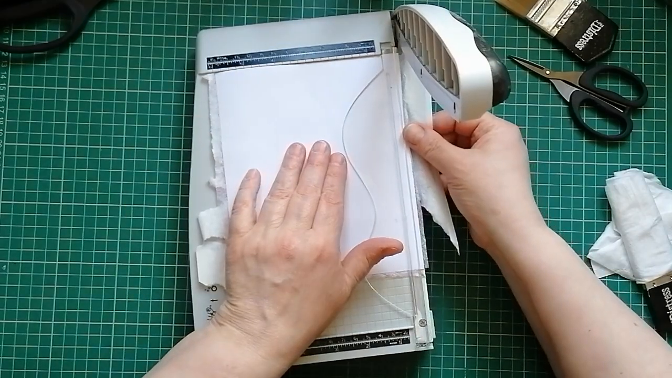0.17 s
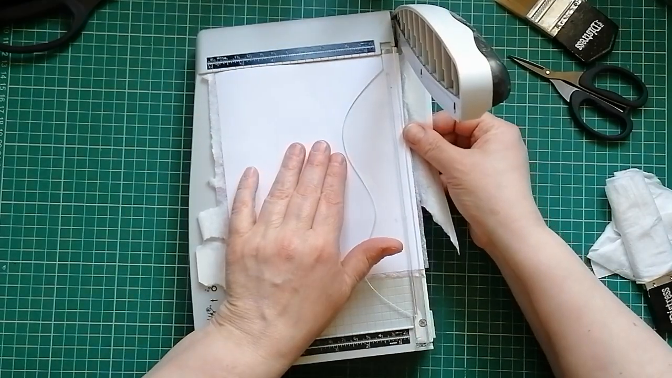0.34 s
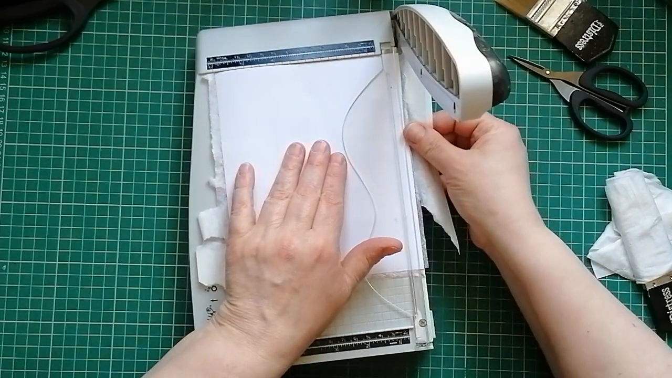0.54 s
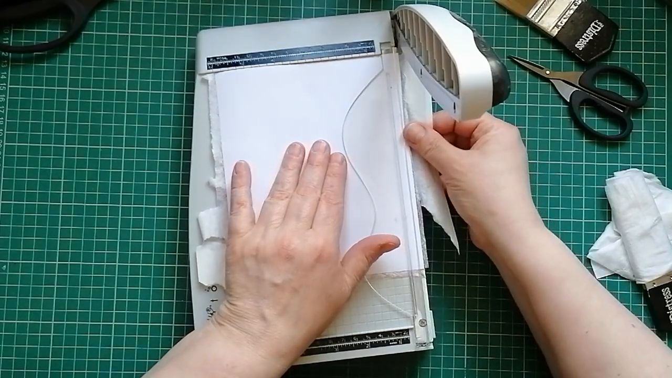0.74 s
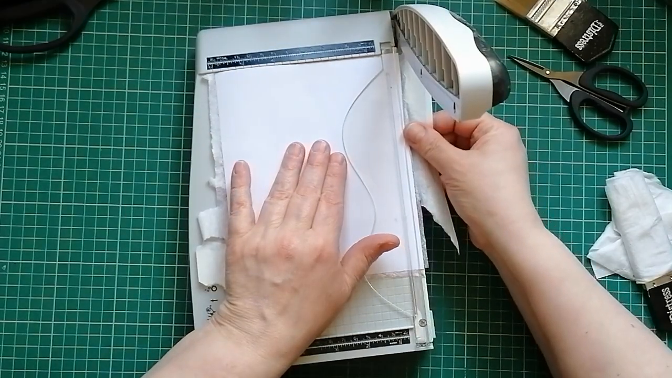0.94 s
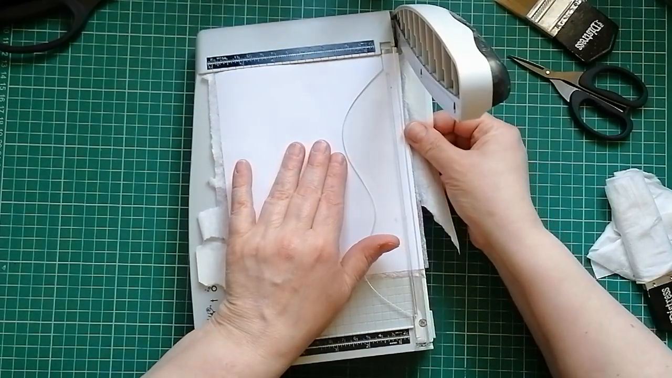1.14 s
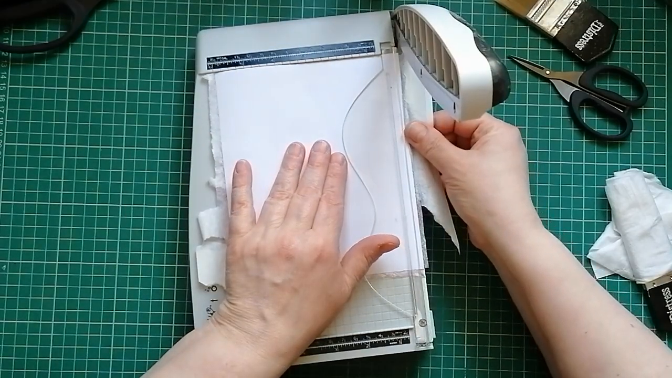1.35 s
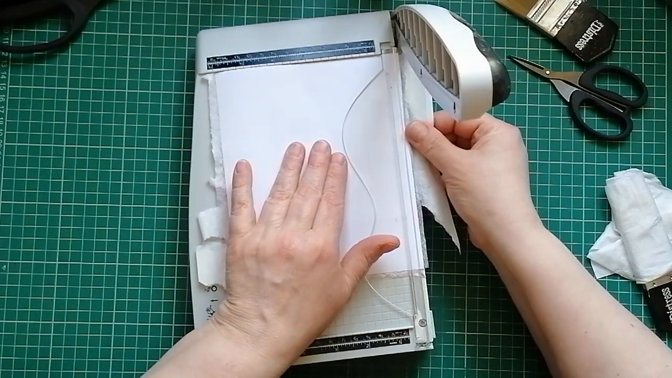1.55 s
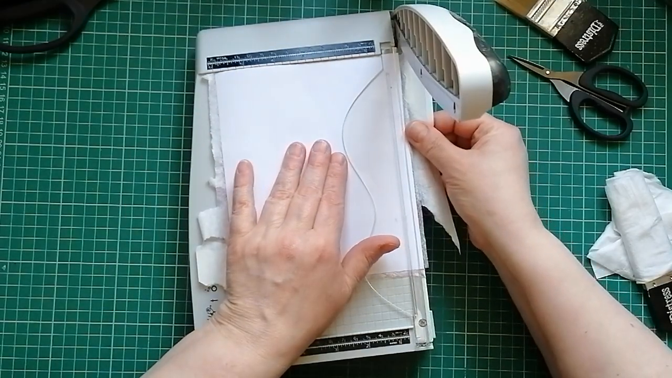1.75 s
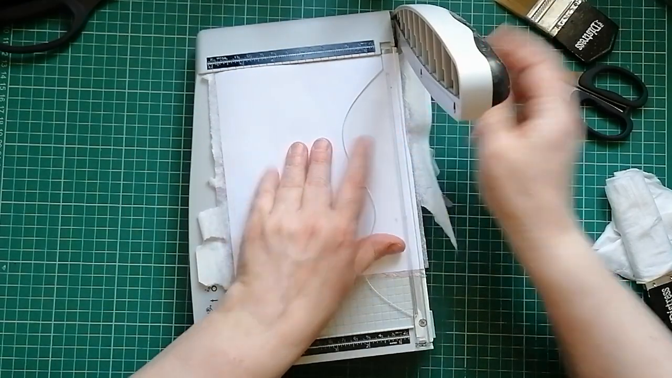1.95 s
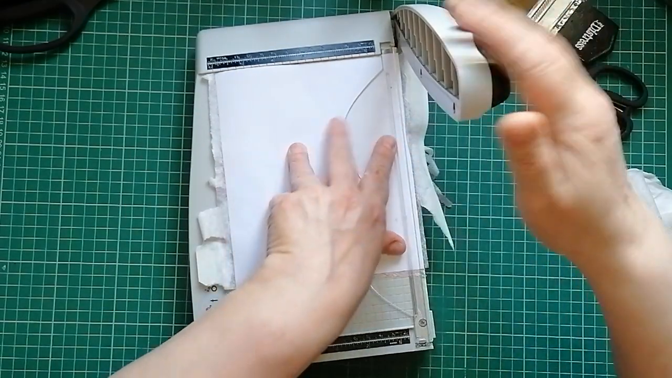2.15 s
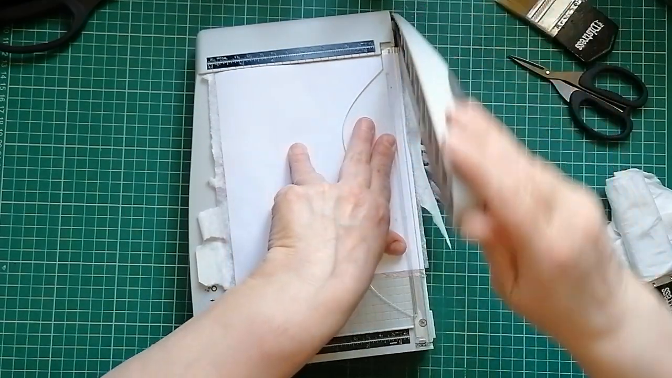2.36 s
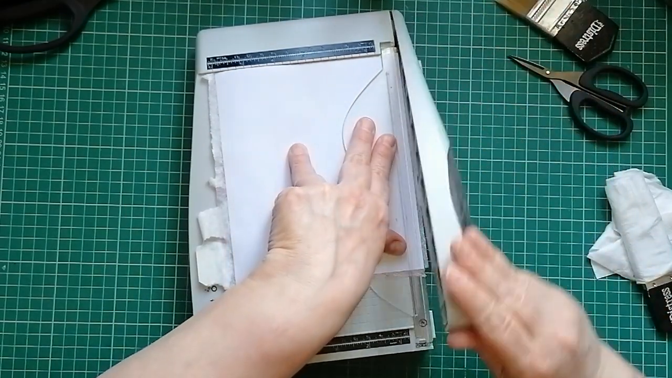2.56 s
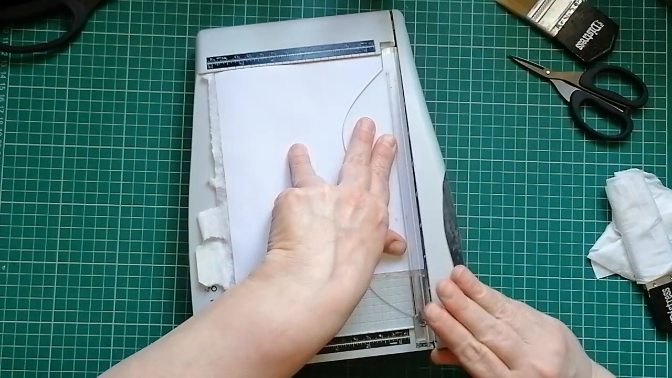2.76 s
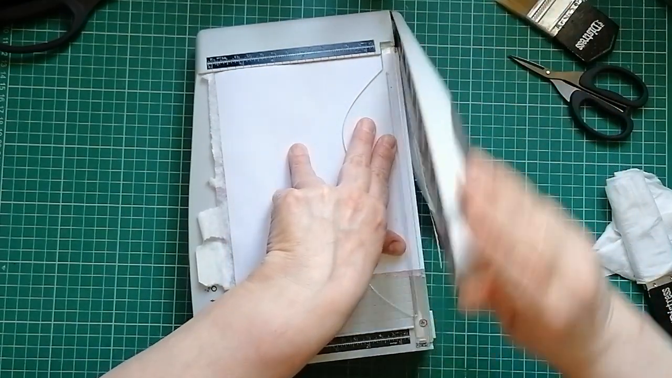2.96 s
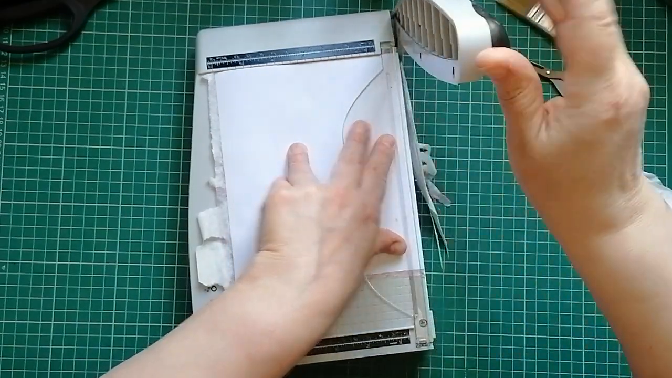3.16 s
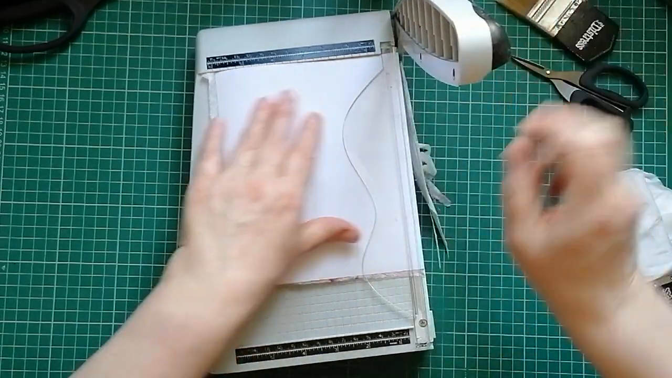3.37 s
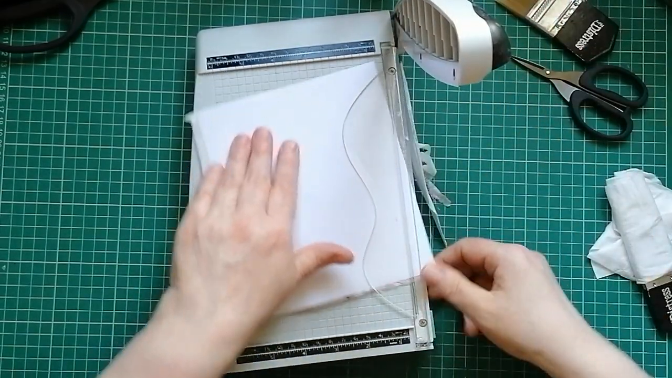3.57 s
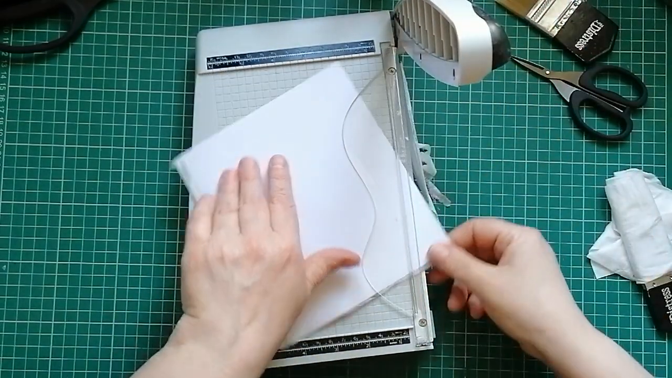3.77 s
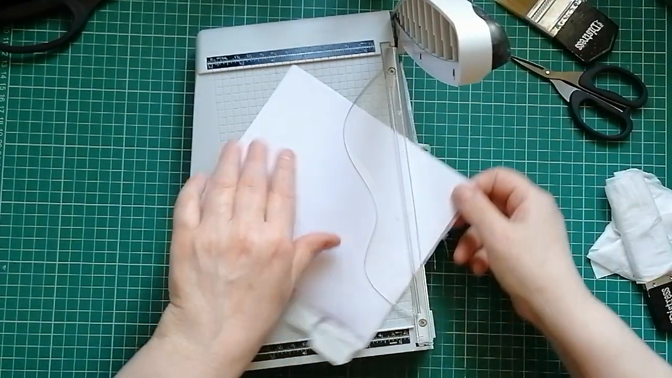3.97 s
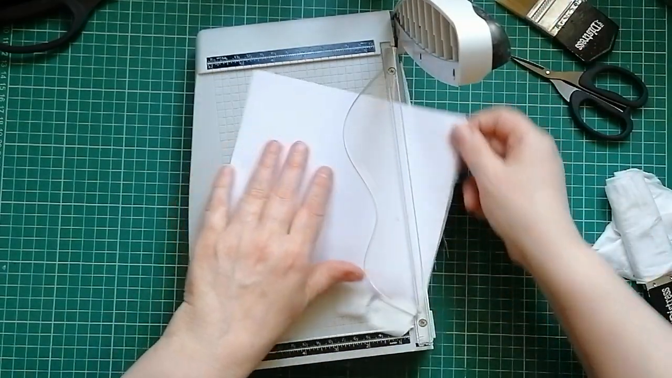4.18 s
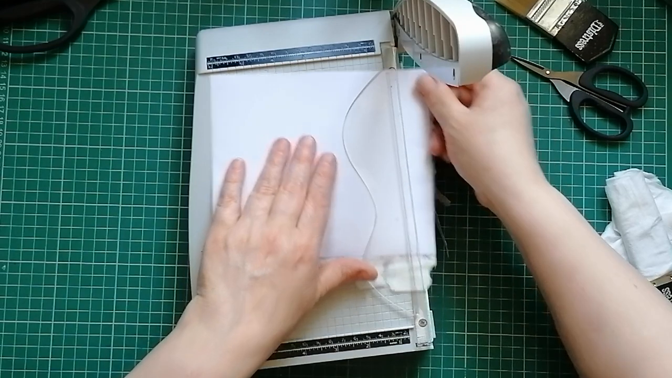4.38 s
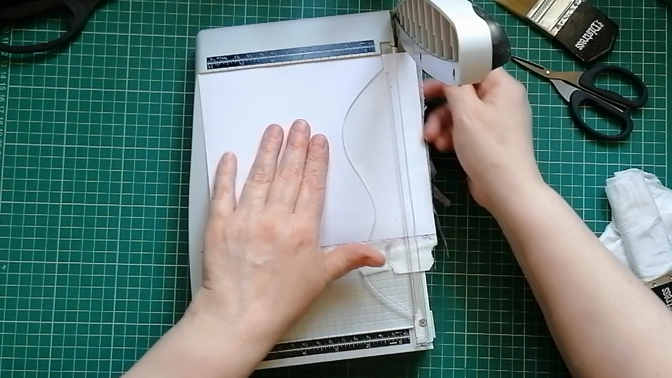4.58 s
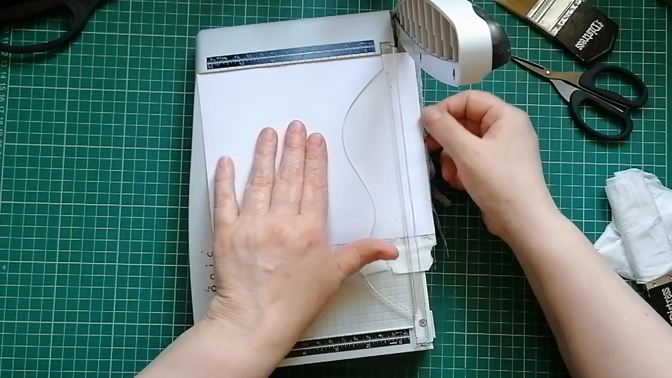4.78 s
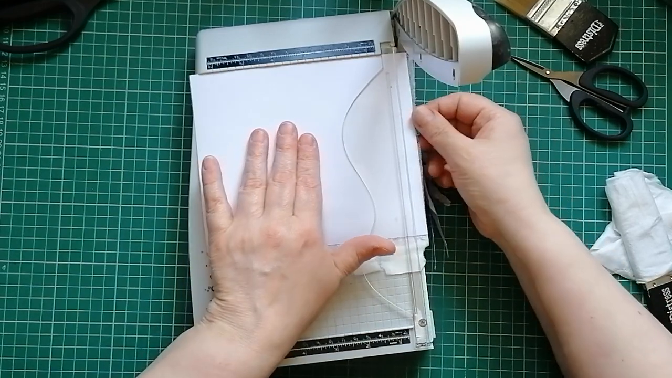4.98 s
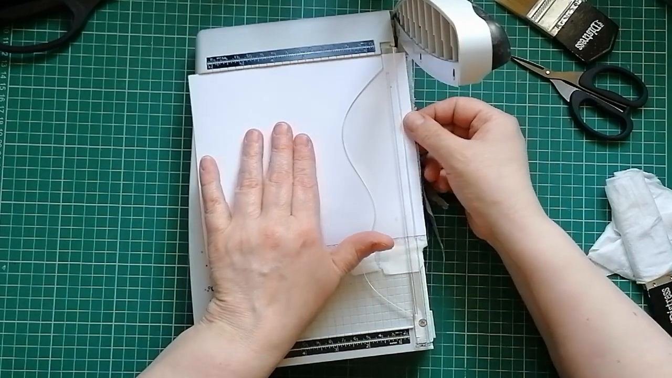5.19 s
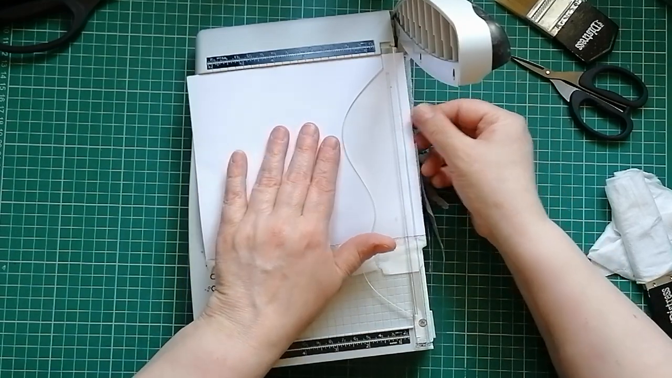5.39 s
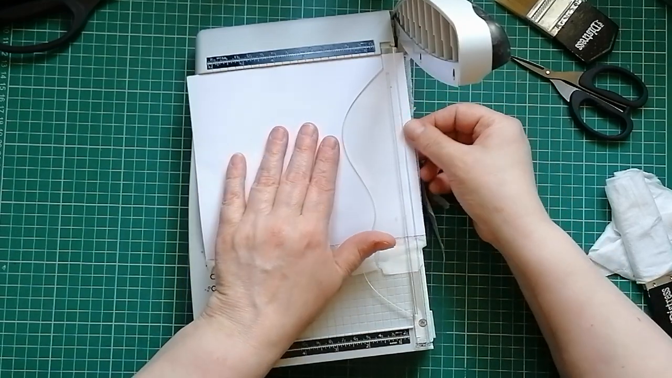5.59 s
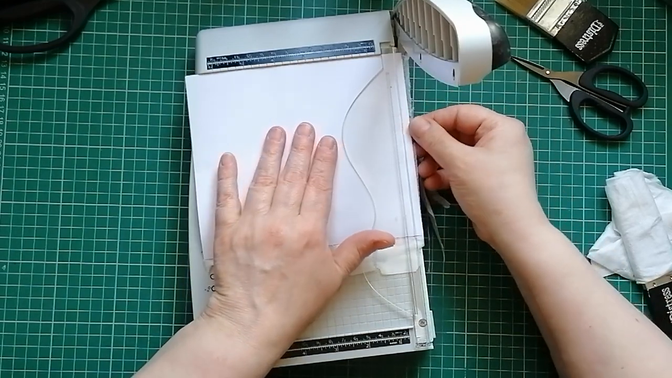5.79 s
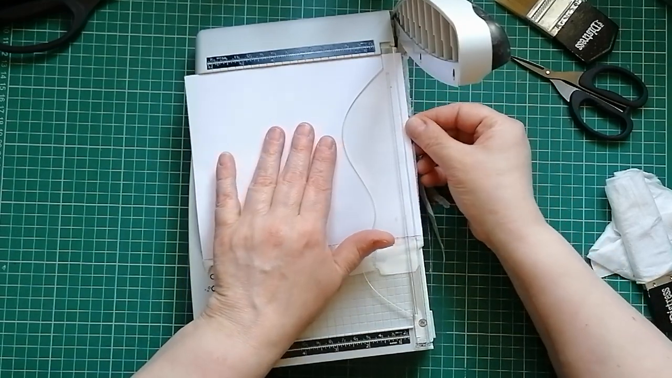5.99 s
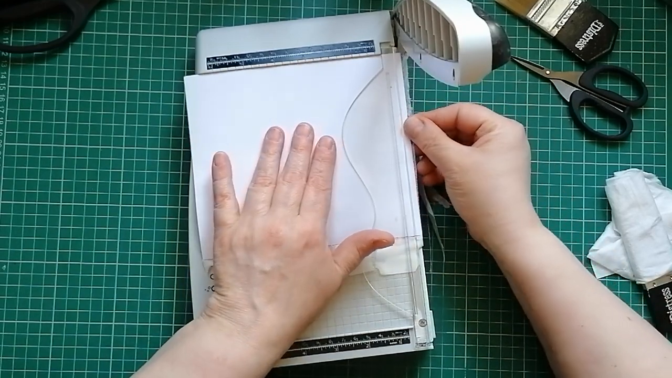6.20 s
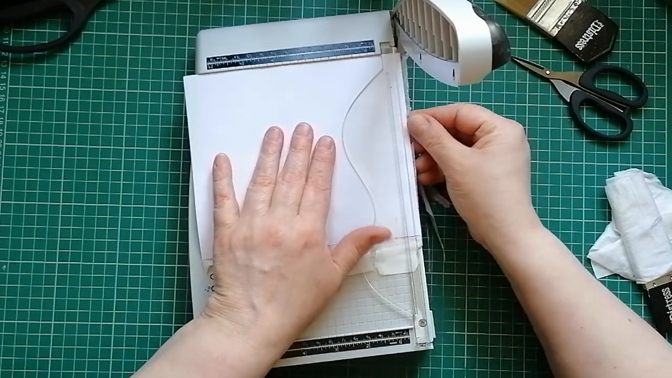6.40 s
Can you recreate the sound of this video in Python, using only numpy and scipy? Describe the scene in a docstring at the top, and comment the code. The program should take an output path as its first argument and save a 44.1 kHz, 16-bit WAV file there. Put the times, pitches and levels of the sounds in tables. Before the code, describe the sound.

A hand knocks a paper trimmer's lever, the blade shears down with a gritty metallic scrape and back up, then paper rustles and snaps softly.

```python
"""A lever paper trimmer on a craft table, over mains hum, faint hiss and the low sway of a springy microphone stand.
A hand rubs and knocks as it takes the arm; then the blade shears down through a sheet and scrapes back up: random
slips ring the modes of base and blade, filtered grains hiss, and narrow resonances squeal where the blade catches.
More knocks follow, and the sheet is turned and nudged into place: grains in moving bands rustle, noise bursts snap."""
import sys
import numpy as np
from scipy import signal
from scipy.fft import rfft, irfft, next_fast_len
from scipy.io import wavfile

SR = 44100
rng = np.random.default_rng(int(sys.argv[2]) if len(sys.argv) > 2 else 0)


def digitize_waveform(pressure):
    """Quantize a signal to 16-bit integers and store it at the path in sys.argv[1].

    Rows of a 2-D input are taken as channels; values are limited to [-1, 1].
    """
    field = np.atleast_2d(pressure).T
    bounded = np.clip(field, -1, 1)
    quanta = np.round(bounded * 32767).astype(np.int16)
    wavfile.write(sys.argv[1], SR, quanta)


N = 284004
TIME = np.arange(N) / SR   # s
SILENCE_DB = -95

# trimmer modes of base and arm, mostly below 1 kHz: f/Hz, level/dB
BASE_MODES = [(240, -5.5), (325, 5), (395, 2.5), (437, 4), (495, -6), (560, 0), (727, 3.5), (790, -2.5),
              (870, -1.5), (970, -3), (1130, -9.5)]
# trimmer modes of the blade, above them: f/Hz, level/dB
BLADE_MODES = [(1310, -6.5), (1430, -3), (1700, -2), (1900, -1.5), (2280, 1), (2480, -6.5), (2740, -2),
               (3040, -3.5), (3270, -4.5), (3470, -16), (3700, -7.5), (4350, -17), (4750, -0.5),
               (5080, -12.5), (5870, -1), (6900, -1)]


def blade_strokes():
    """Edge grinds on edge: slips set base and blade ringing, fibres part with a hiss."""
    # colour of the shearing hiss: f/Hz, relative density/dB
    shear_colour = [(600, -22.5), (1100, -7), (2800, -8), (5900, -13), (9000, -24), (15500, -39.5)]
    span = slice(int(2.4 * SR), int(3.3 * SR))
    drone_db, drone_hz, ring_db, ring_hz, hiss_db = [c[span] for c in stroke_controls()]

    slips = (grains(2200, spread_db=3.0) * amp(0.94 * drift(45)))[span]
    base = damped(BASE_MODES, 18, 0.0012)
    drone = moving_modes(base, slips, drone_hz, octaves=0.29, far_db=-9.5, patchy_db=1.0, rate_hz=15)
    table_top = amp(-23.0) * band(slips, 58, 210)   # the pressure also rumbles through the table

    edge = damped(BLADE_MODES, 30, 0.011)
    ring = moving_modes(edge, slips, ring_hz, octaves=0.16, far_db=-5.0, patchy_db=3.0, rate_hz=25)
    # the free length of blade glides with the contact
    glide = np.sqrt(2) * np.sin(2 * np.pi * np.cumsum(ring_hz) / SR)
    ring = ring + amp(-4.0) * drift(70, size=len(ring)) * glide

    fibres = grains(3000, spread_db=0.5) + amp(-13.5) * grains(240, spread_db=7.0)
    hiss = coloured(fibres * amp(0.89 * drift(40)), shear_colour)[span]

    out = np.zeros(N)
    out[span] = amp(drone_db) * (drone + table_top) + amp(ring_db) * ring + amp(hiss_db) * hiss
    return out


def stroke_controls():
    """Both strokes in a row, from silence to silence: drone level and pitch, ring level and pitch, hiss level."""
    # blade strokes, down then up, one curve each:
    # t/s, base and arm drone level/dB, f/Hz where the drone is strongest, edge contact level/dB
    strokes = [
        [(2.44, -26.5, 320, -70), (2.478, -34.5, 382, -51.5), (2.51, -23.5, 427, -39.5),
         (2.55, -19, 320, -38.5), (2.64, -21, 453, -32.5), (2.68, -21.5, 690, -33.5), (2.72, -19.5, 710, -30.5),
         (2.74, -27, 710, -30.5), (2.772, -28, 670, -29.5), (2.795, -36, 540, -54.5)],
        [(2.845, -43, 500, -49), (2.865, -32.5, 486, -36.5), (2.91, -32, 520, -30), (2.95, -29.5, 734, -37),
         (3.0, -30.5, 453, -43.5), (3.035, -20.5, 416, -38), (3.06, -26.5, 388, -47), (3.075, -48, 414.8, -54)],
    ]
    # the edge ring wanders as the contact point travels: t/s, f/Hz
    edge_pitch = [(2.5, 2850), (2.55, 2680), (2.6, 3250), (2.65, 2450), (2.7, 3000), (2.735, 3600),
                  (2.78, 3750), (2.85, 1720), (2.95, 1912), (3.03, 1310)]
    # shearing hiss over the ring, one value per stroke: level/dB
    shear_level = [2, 1.5]
    touch_s, leave_s = 0.015, 0.029   # time to rise from and sink to silence

    rows = []
    for stroke, hiss_db in zip(strokes, shear_level):
        for s, drone_db, drone_hz, edge_db in stroke:
            ring_hz = np.interp(s, *np.transpose(edge_pitch))
            rows.append((s, drone_db, drone_hz, edge_db, ring_hz, edge_db + hiss_db))

    def still(s, row):
        """The same pitches with every level at silence."""
        return (s, SILENCE_DB, row[2], SILENCE_DB, row[4], SILENCE_DB)

    first = still(rows[0][0] - touch_s, rows[0])
    last = still(rows[-1][0] + leave_s, rows[-1])
    return played([first] + rows + [last])


def squeals():
    """Quick uneven slips lock to one pitch: a rough tone with two overtones that swells and stops."""
    # the blade catches: start t/s, length/s, level/dB, f/Hz, second partial's level over the first/dB
    catches = [(2.625, 0.047, -38.5, 2926, 5), (2.844, 0.023, -27, 1744, -1),
               (2.883, .016, -23.5, 1718, -15.5), (2.901, 0.0093, -26.5, 1810, -1.5),
               (2.923, 0.013, -24.5, 1670, -6)]
    width_hz, third_partial_db = 170, -11.5   # the third partial is set against the second
    out = np.zeros(N)
    for s, length, db, hz, over_db in catches:
        at, size = round(s * SR), round(length * SR)
        slips = rng.standard_normal(int(0.1 * SR))
        partials = []
        for k in range(1, 4):
            twice = resonate(resonate(slips, k * hz, width_hz), k * hz, width_hz)
            partials.append(rms_one(twice[-size:]))   # the end, where the resonance has built up
        tone = partials[0] + amp(over_db) * (partials[1] + amp(third_partial_db) * partials[2])
        out[at:at + size] += amp(db) * tone * np.sin(np.pi * np.arange(size) / size)
    return out


def knocks():
    """A short rattling contact drives the base and blade modes near where it lands, and a broad crack."""
    # knocks on arm and base: t/s, level/dB, low thud's relative level/dB, its f/Hz,
    # blade ring's relative level/dB, its f/Hz, noise decay t60/s, rise/ms
    hits = [(2.031, -39.5, -1, 646, -3, 3030, 0.16, 0.78),
            (2.261, -3.5, -15.5, 372, -17.5, 4070, 0.083, 1.8),
            (2.325, -18, -13, 570, -20.5, 6840, 0.15, 3.8), (2.351, -21.5, -4, 517, -27, 2740, 0.086, 0.42),
            (2.432, -18.5, -14, 315.6, -6.5, 1740, 0.046, 1.9),
            (2.504, -16.5, -3.5, 442.6, -6, 2500, 0.12, 1), (2.582, -23.5, -18, 427, -2, 3200, .08, .8),
            (2.733, -13, -25, 727, -4, 3540, 0.14, 0.96), (2.822, -26.5, -9, 563, -3.5, 6820, 0.12, 0.44),
            (3.072, -27.5, -9, 410, -5.5, 6740, 0.13, 1.4), (3.164, -33.5, 2, 763, -4.5, 2200, 0.095, .8),
            (3.267, -26, -11, 750, -14, 3200, 0.091, 1), (3.632, -41, 0.5, 328, -26.5, 6020, 0.059, 0.94),
            (5.455, -28, -12, 553, -7.5, 1550, 0.093, 0.65), (5.513, -56.5, 3, 980, -23.5, 1510, 0.04, 1.1)]
    out = np.zeros(N)
    for s, db, thud_db, thud_hz, ring_db, ring_hz, t60, rise_ms in hits:
        at, puff = burst(s, t60, rise_ms)
        blow = puff * amp(-600 * np.arange(len(puff)) / SR)   # the modes are fed only briefly
        thud = sum(amp(level) * (near(f, thud_hz, 0.33) + 0.085) * resonate(blow, f, w)
                   for f, w, level in damped(BASE_MODES, 30, 0.017))
        ring = sum(amp(level) * (near(f, ring_hz, 0.31) + 0.05) * resonate(blow, f, w)
                   for f, w, level in damped(BLADE_MODES, 170, 0.02))
        thud, ring = band(thud, 83, 1500), band(ring, 440, 6900)
        crack = amp(-12.0) * band(puff, 1800, 4800) + amp(-32.0) * band(blow, 4600, 15000)
        bright = ring / np.abs(ring).max() + crack
        knock = amp(thud_db) * thud / np.abs(thud).max() + amp(ring_db) * bright
        out[at:at + len(puff)] += amp(db) * knock
    return out


def sliding_sheet():
    """Paper grain rubs over plastic: the free sheet favours one region, the trimmer sounds under it."""
    # broad part of the rustle: f/Hz, relative level per band/dB
    sheet_colour = [(1200, -13.5), (2000, 4), (6000, 16), (9000, 1.5), (15000, -11.5)]
    squeak_octaves = 0.16   # rubs narrower than this ring the blade more than the sheet
    span = slice(int(1.7 * SR), N)
    rustle_db, centre_hz, octaves, drum_db, drum_hz = [c[span] for c in rub_controls()]
    spread = np.maximum(octaves, 0.08)

    flutter = amp(1.7 * drift(45))
    rubs = []   # two streams, so that neighbouring bands are unrelated
    for _ in range(2):
        fine_and_coarse = grains(9800, spread_db=1.0) + amp(-15.5) * grains(160, spread_db=5)
        rubs.append((fine_and_coarse * flutter)[span])

    hz, db = np.transpose(sheet_colour)
    edges = np.geomspace(1150, 15500, 17)   # Hz
    rustle, power = 0, 1e-9
    for k, (low, high) in enumerate(zip(edges, edges[1:])):
        mid = np.sqrt(low * high)
        # a narrow squeak has little broad part
        broad = amp(np.interp(np.log(mid), np.log(hz), db) - 6.5) * octaves ** 2
        gain = broad + near(mid, centre_hz, spread)
        rustle = rustle + gain * amp(2.2 * drift(14, size=len(gain))) * band(rubs[k % 2], low, high)
        power = power + gain ** 2
    rustle = amp(-5.5) * bounced(rustle / np.sqrt(power))

    squeak = np.clip(1 - octaves / squeak_octaves, 0, 1)
    streaks = damped(BLADE_MODES, 35, 0.018)
    ring = moving_modes(streaks, rubs[1], centre_hz, spread, far_db=-20, patchy_db=4.5, rate_hz=9)
    under = damped(BASE_MODES[1:] + BLADE_MODES[:5], 40, 0.05)
    drum = moving_modes(under, rubs[0], drum_hz, octaves=0.71, far_db=-28, patchy_db=2.5, rate_hz=12)

    out = np.zeros(N)
    mix = (1 - squeak) * rustle + (amp(-12.5) + squeak) * ring + amp(drum_db) * drum
    out[span] = amp(rustle_db) * mix
    return out


def rub_controls():
    """Each rub sets in fast, swells, fades and lets go; powers add and weight the average colour."""
    # rubs of sheet and fingers: start t/s, swell/s, fade/s, level/dB, depth of swell and fade/dB
    # (negative: a dip), rustle centre f/Hz, its spread/octaves, trimmer drumming's relative level/dB, its f/Hz
    strokes_of_hand = [(1.863, 0.059, 0.023, -50.5, 10.5, 5707, 0.33, -4.5, 1317),
                       (1.946, 0.014, 0.18, -60, -2, 3340, 1, 1.5, 484.6),
                       (2.05, 0.011, 0.11, -57, 1, 3930, 0.92, 0.5, 626),
                       (2.111, 0.02, 0.046, -49.5, 5, 4425, 0.99, 3.5, 536),
                       (2.189, 0.056, 0.0054, -44.5, 14, 5750, 0.81, -3, 692),
                       (2.253, 0.0035, 0.2, -52.5, 15, 3140, 0.52, 0.5, 730),
                       (3.128, 0.066, 0.12, -62.5, 3, 3800, 0.7, 4, 710),
                       (3.333, 0.024, 0.012, -48, 17, 5010, 0.63, -32, 899),
                       (3.37, .3, 0.76, -67, -4, 3900, 1.2, -7, 886),
                       (3.439, 0.088, 0.012, -39.5, 12.5, 3790, 0.62, -9.5, 1007),
                       (3.539, 0.02, 0.092, -31, 1, 4310, 0.59, -16, 1060),
                       (3.661, 0.015, 0.08, -42, 3.5, 3960, 0.83, -6, 870),
                       (3.752, 0.026, 0.015, -38.5, 7.5, 3900, .7, -10.5, 858),
                       (3.801, 0.11, 0.0093, -43, 4, 4555, .75, -9.5, 878),
                       (3.948, 0.034, 0.075, -44.5, 9.5, 3510, .6, -9, 655),
                       (4.158, 0.12, 0.1, -42.5, 14.5, 3150, 0.72, -14, 1155),
                       (4.446, 0.032, 0.052, -41, 17, 2770, 0.45, -2, 930),
                       (4.519, 0.042, 0.047, -54.5, -4.5, 2703, 0.62, 2, 1010),
                       (4.623, 0.013, 0.039, -43, 10, 5300, 0.2, -1, 1210),
                       (4.836, 0.08, 0.032, -57, 8, 4185, 0.79, -7.5, 1826),
                       (4.935, 0.0097, 0.18, -59, 7.5, 3360, 0.51, -3.5, 795),
                       (5.101, 0.044, 0.072, -55.5, -0.5, 4410, 0.7, -14, 1425),
                       (5.345, 0.085, 0.013, -57, 12, 4510, 0.56, -9.5, 496),
                       (5.448, 0.029, 0.0077, -54.5, 3.5, 3720, 0.76, -8, 1100),
                       (5.619, 0.13, 0.023, -58, 6, 4435, 0.6, -15.5, 713),
                       (5.798, 0.048, 0.1, -59.5, 8, 3520, 0.28, -5, 622),
                       (5.92, 0.027, 0.017, -55, 8, 4304, 0.39, -2.5, 580),
                       (5.965, 0.011, 0.097, -65.5, 12.5, 4640, 0.096, -15, 1037),
                       (6.364, 0.0096, 0.076, -55.5, 17, 3520, .15, -13, 604)]
    onset_db_per_s, release_db_per_s = 1206, 483
    power, colour = amp(2 * SILENCE_DB - 40), 0
    for start, swell, fade, db, depth_db, *tone in strokes_of_hand:
        swell, fade = max(swell, 0.002), max(fade, 0.002)
        end = start + swell + fade
        body = peaked(start + swell, depth_db / swell, depth_db / fade)
        edges = np.minimum((TIME - start) * onset_db_per_s, (end - TIME) * release_db_per_s) - depth_db
        inside = (TIME > start) & (TIME < end)
        level_db = np.maximum(db + np.where(inside, body, edges), SILENCE_DB - 20)
        own = amp(2 * level_db)   # doubled decibels give power
        power = power + own
        colour = colour + own * np.array(tone)[:, None]
    return [10 * np.log10(power), *(colour / power)]


def snaps():
    """A buckle in the sheet pops through: a sharp coloured tick and a weaker dying puff."""
    # snaps of the sheet: t/s, level/dB, f/Hz
    buckles = [(3.435, -42, 3760), (4.453, -48, 2102), (4.475, -39.5, 5230), (4.484, -35.5, 3750),
               (4.626, -45, 4780), (4.668, -30.5, 5920), (4.691, -33, 5930), (4.862, -52, 5500),
               (4.887, -34.5, 4540), (4.935, -43.5, 3700), (4.984, -49, 4800), (4.991, -56, 6130),
               (5.033, -37.5, 3550), (5.106, -36.5, 4930), (5.6032, -50.5, 3610), (5.8277, -50, 3670),
               (6.054, -65, 4590), (6.1166, -64.5, 3950), (6.152, -65.5, 3760), (6.4058, -53, 4840)]
    ratio = 1.22   # pitch ratio either side of the centre
    out = np.zeros(N)
    for s, db, hz in buckles:
        at, puff = burst(s, t60=0.061, rise_ms=0.45)
        puff = puff * (amp(-20.0) + np.exp(-np.arange(len(puff)) / (0.0005 * SR)))
        pop = band(puff, hz / ratio, hz * ratio)
        pop = pop / np.abs(pop).max()
        pop = pop + amp(1.5) * band(puff, 1880, 7070) + amp(-19.5) * band(puff, 9000, 14300)
        out[at:at + len(puff)] += amp(db) * pop
    return bounced(out)


def bounced(x):
    """Direct sound plus its table reflection: bright and dull bands that shift as the delay drifts."""
    bounce_ms, gain = 0.54, 0.3
    at = np.arange(len(x))
    lag = bounce_ms * SR / 1000 * (1 + 0.04 * drift(1.2, size=len(x)))
    return (x + gain * np.interp(at - lag, at, x, left=0)) / np.sqrt(1 + gain ** 2)


def room(x):
    """A short dull tail of dense reflections."""
    t60_s = 0.083   # decay of the noise tail
    age = np.arange(int(0.4 * SR)) / SR
    tail = rng.standard_normal(len(age)) * amp(-60 * age / t60_s) * (age > 0.004)
    tail = signal.lfilter([1], [1, -0.6], tail)
    return signal.fftconvolve(x, tail / np.sqrt(np.sum(tail ** 2)))[:N]


def background():
    """Swaying modes of the stand with a rumble that follows them, mains hum and hiss."""
    # modes of the swaying stand: f/Hz, level relative to the sway/dB
    stand_modes = [(21.5, 3), (49.5, -4.5), (100, -15.5)]
    # mains hum: f/Hz, rms level/dB
    hum_partials = [(100, -63), (200, -76.5), (350, -93), (400, -89)]
    # colour of the hiss: f/Hz, relative density/dB
    hiss_colour = [(25, -5), (70, -8), (130, -24), (250, -27.5), (1000, -39), (3000, -44), (6000, -50),
                   (9000, -58), (16000, -68)]
    hiss_db = -65.5

    sway_db = sway_level()
    sway = 0
    for hz, db in stand_modes:
        level = amp(sway_db + db + 1.5 * drift(15))
        cycles = np.cumsum(hz * (1 + 0.013 * drift(2.6))) / SR
        sway = sway + level * np.sin(2 * np.pi * cycles)
    rumble = amp(sway_db - 26.0) * band(rng.standard_normal(N), 34, 140)
    hum = sum(amp(db + 0.5 * drift(2.1)) * np.sin(2 * np.pi * (hz * TIME + rng.random()))
              for hz, db in hum_partials)
    hiss = amp(hiss_db + drift(3.5)) * coloured(rng.standard_normal(N), hiss_colour)
    return np.sqrt(2) * (sway + hum) + rumble + hiss


def sway_level():
    """Swings of the stand add up in power over a resting tremor."""
    # the stand swings up and settles: peak t/s, level/dB, rise/s and fall/s over swing_db
    swings = [(0.223, -41, 0.1, 0.12), (0.832, -41, 0.21, 0.15), (1.33, -46.5, 0.14, 0.22),
              (1.771, -48.5, 0.23, 0.8), (2.28, -41.5, 0.35, 0.96), (2.51, -37, 0.51, 0.058),
              (2.73, -38, 0.051, 0.27), (3.05, -38, 0.3, 0.099), (3.34, -51.5, 0.19, 0.65),
              (3.822, -34.5, 0.2, 0.21), (4.688, -42, 0.28, 0.044), (5.141, -43, 0.1, 0.18),
              (5.411, -44, 0.16, 0.18), (5.9, -42.5, 0.34, 0.39), (6.44, -43.5, 0.13, 0.23)]
    swing_db, rest_db = 20, -58
    power = sum(amp(2 * (db + peaked(s, swing_db / rise, swing_db / fall))) for s, db, rise, fall in swings)
    return 10 * np.log10(power + amp(2 * rest_db))


def burst(s, t60, rise_ms):
    """Start sample and a puff of noise that rises fast and dies."""
    at = round(s * SR)
    age = np.arange(min(int(0.25 * SR), N - at)) / SR
    rise = np.minimum(1000 * age / max(rise_ms, 0.05), 1)
    noise = rng.standard_normal(int(0.25 * SR))[:len(age)]
    return at, noise * rise * amp(-60 * age / max(t60, 0.003))


def grains(per_s, spread_db):
    """Random micro-slips of uneven size and sign; rms 1."""
    sizes = amp(spread_db * np.minimum(rng.exponential(1, N), 5)) * rng.choice([-1, 1], N)
    return rms_one(sizes * (rng.random(N) < per_s / SR))


def moving_modes(modes, drive, centre_hz, octaves, far_db, patchy_db, rate_hz):
    """Friction feeds each mode in its own patches, most near a moving centre; mode gains are evened in power."""
    out, power = 0, 1e-9
    for k, (hz, width_hz, db) in enumerate(modes):
        gain = amp(db) * (near(hz, centre_hz, octaves) + amp(far_db))
        patches = amp(patchy_db * drift(rate_hz, size=len(drive)))
        out = out + (-1) ** k * resonate(drive * gain * patches, hz, width_hz)
        power = power + 2 * gain ** 2
    return out / np.sqrt(power)


def damped(modes, base_hz, share):
    """Give each mode a width that grows with its pitch."""
    return [(hz, base_hz + share * hz, db) for hz, db in modes]


def near(hz, centre_hz, octaves):
    """Weight of a mode by its distance from the centre of excitation."""
    return np.exp(-0.5 * (np.log2(hz / centre_hz) / octaves) ** 2)


def resonate(x, hz, width_hz):
    """One resonance, equal power for noise whatever its width."""
    r = np.exp(-np.pi * width_hz / SR)
    zeros = np.sqrt(1 - r * r) * np.array([1, 0, -1])
    poles = [1, -2 * r * np.cos(2 * np.pi * hz / SR), r * r]
    return signal.lfilter(zeros, poles, x + 1e-18)


def band(x, low_hz, high_hz):
    """Steep band-pass with equal power out for white noise in."""
    sos = signal.butter(3, [low_hz, high_hz], "band", fs=SR, output="sos")
    return signal.sosfilt(sos, x) / np.sqrt(2.1 * (high_hz - low_hz) / SR)


def coloured(x, spectrum):
    """Shape a stream to a spectrum; rms 1."""
    hz, db = np.transpose(spectrum)
    size = next_fast_len(N)
    axis = np.log(np.arange(size // 2 + 1) * SR / size + 1)
    gain = amp(np.interp(axis, np.log(hz), db))
    return rms_one(irfft(rfft(x, size) * gain, size)[:N])


def drift(rate_hz, size=N):
    """Slow random wander of spread 1: noise made at one fortieth of the sample rate, low-passed with its corner
    near rate_hz."""
    r = np.exp(-80 * np.pi * rate_hz / SR)
    noise = rng.standard_normal(N // 40 + 2002)
    slow = signal.lfilter([1], [1, -2 * r, r * r], noise)[2000:]   # drop the filter's settling
    return np.interp(np.arange(size) / 40, np.arange(len(slow)), rms_one(slow))


def peaked(peak_s, rise_db_per_s, fall_db_per_s):
    """Decibels relative to a peak, on a straight rise and a straight fall."""
    return np.minimum((TIME - peak_s) * rise_db_per_s, (peak_s - TIME) * fall_db_per_s)


def played(rows):
    """Columns joined by straight lines in time."""
    s, *columns = np.transpose(rows)
    return [np.interp(TIME, s, c) for c in columns]


def amp(db):
    """Decibels to gain."""
    return 10 ** (np.asarray(db) / 20)


def rms_one(x):
    """Scale to unit rms."""
    return x / np.sqrt(np.mean(x ** 2) + 1e-20)


def scene():
    """Everything on the table, its room, and the background."""
    table = blade_strokes() + squeals() + knocks() + sliding_sheet() + snaps()
    room_db = -22.5
    return (table + amp(room_db) * room(table) + background())[None]


def record(dry):
    """A steep low-pass removes the top, 60 dB down from 15.7 kHz."""
    return signal.sosfilt(signal.cheby2(12, 60, 15700, fs=SR, output="sos"), dry)


dry = scene()
out = record(dry)
digitize_waveform(out)
```